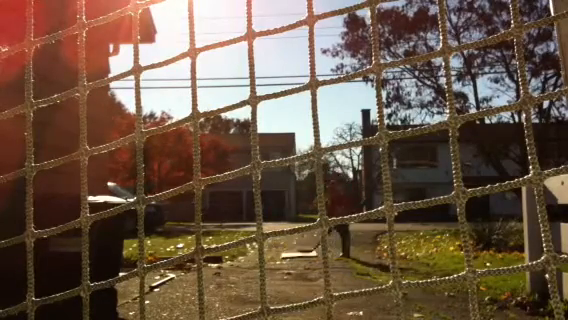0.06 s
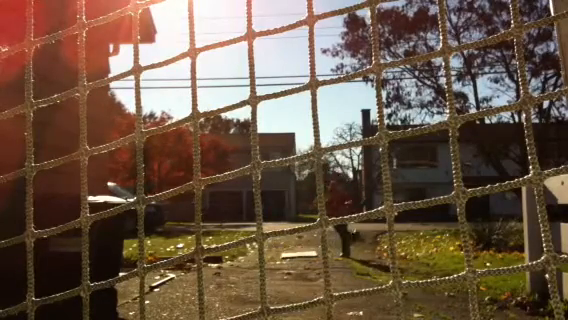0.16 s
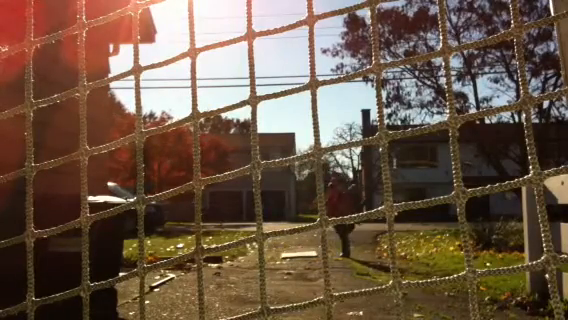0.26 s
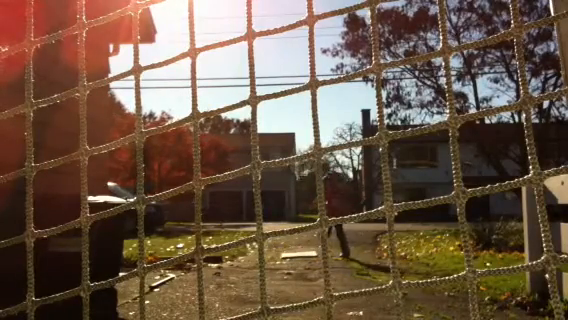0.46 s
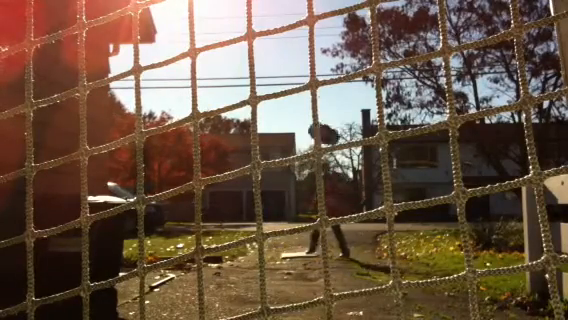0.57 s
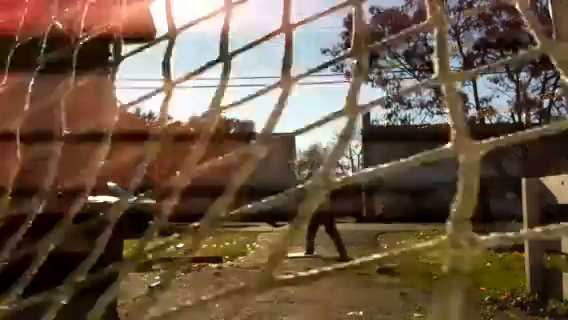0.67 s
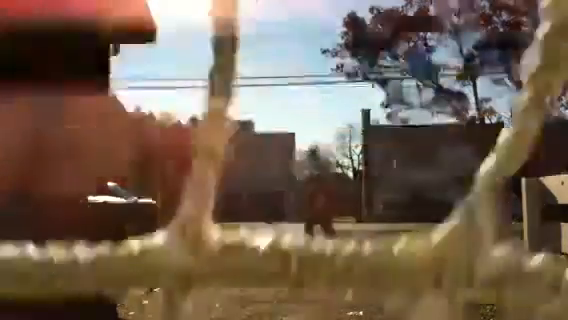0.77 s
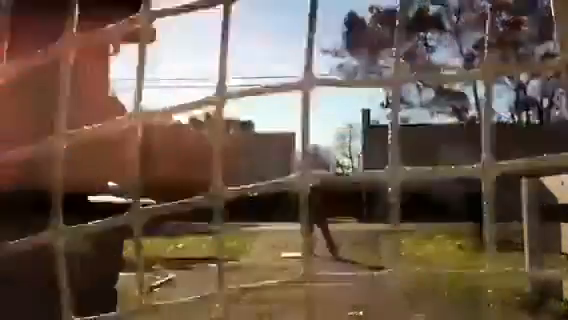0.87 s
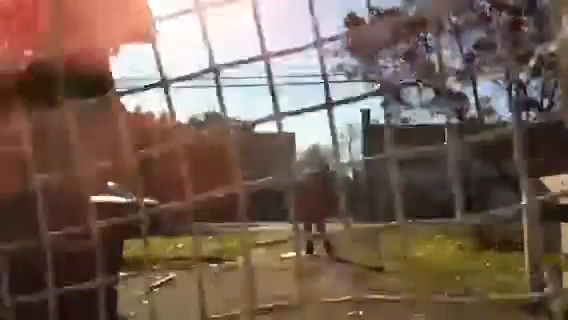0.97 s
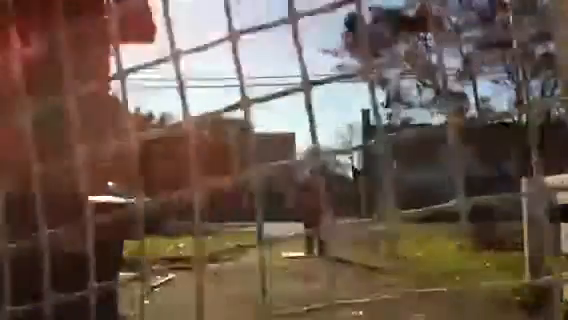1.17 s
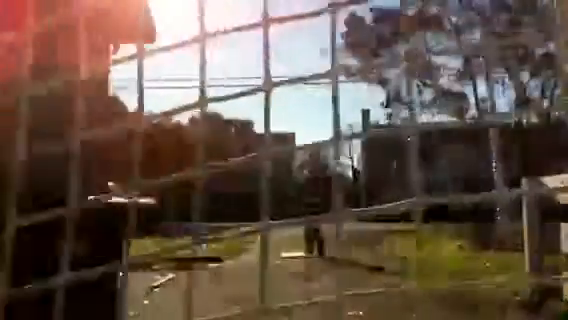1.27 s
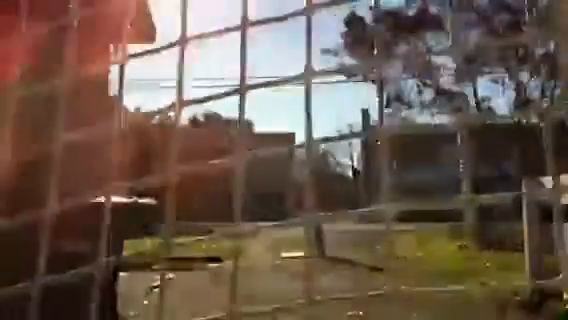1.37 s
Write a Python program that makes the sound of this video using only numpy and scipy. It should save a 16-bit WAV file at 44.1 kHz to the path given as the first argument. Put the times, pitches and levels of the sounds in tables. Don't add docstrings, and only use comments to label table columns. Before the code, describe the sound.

A hockey slapshot cracks across a quiet yard, then the puck slams into a rattling goal net

```python
import sys
import numpy as np
from scipy import signal
from scipy.fft import rfft, irfft, next_fast_len
from scipy.io import wavfile
from scipy.ndimage import uniform_filter1d, map_coordinates

SR = 44100
rng = np.random.default_rng(int(sys.argv[2]) if len(sys.argv) > 2 else 0)


def inscribe(sig):
    pcm = np.round(np.clip(np.atleast_2d(sig).T, -1, 1) * 32767)
    wavfile.write(sys.argv[1], SR, pcm.astype(np.int16))


def invert_db(x):
    u = np.asarray(x, float) / 20
    return 10 ** u


N = 61739


def unit(x):
    return x / np.sqrt(np.mean(x ** 2) + 1e-20)


def along(points, hz):
    f, v = np.transpose(points)
    return np.interp(np.log(hz + 1), np.log(f + 1), v)


def curves(rows):
    s, *cols = np.transpose(rows)
    return [np.interp(np.arange(N) / SR, s, c) for c in cols]


def gated(rows):
    before = [(rows[0][0] - .001, -150)]
    after = [(rows[-1][0] + .04, -150)]
    return invert_db(curves(before + list(rows) + after)[0])


def wobble(rate_hz):
    knots = rng.standard_normal(int(N * rate_hz / SR) + 4)
    return map_coordinates(knots, [np.arange(N) * rate_hz / SR])


def filtered(x, response):
    m = next_fast_len(N + SR // 2)
    return irfft(rfft(x, m) * response(np.fft.rfftfreq(m, 1 / SR)), m)[..., :N]


def resonant(x, peaks):
    def response(f):
        total = 0
        for k, (hz, width_hz, db) in enumerate(peaks):
            damping = 1j * f * width_hz
            total = total + (-1) ** k * invert_db(db) * damping / (hz * hz - f * f + damping)
        return total
    return filtered(x, response)


def rush(spectrum, patchy_db):
    z = signal.stft(rng.standard_normal(N + 512), nperseg=512)[2]
    field = uniform_filter1d(rng.standard_normal(z.shape), 5, 0)
    field = uniform_filter1d(field, 6, 1)
    x = signal.istft(z * invert_db(patchy_db * unit(field)), nperseg=512)[1][:N]
    return unit(filtered(x, lambda hz: invert_db(along(spectrum, hz))))


def tail(x, t60s):
    hz, t, z = signal.stft(rng.standard_normal(SR), SR, nperseg=256)
    decay = invert_db(-60 * t / along(t60s, hz)[:, None])
    h = signal.istft(z * decay, SR, nperseg=256)[1]
    return signal.fftconvolve(np.pad(x, (300, 0)), h / np.linalg.norm(h))[:N]


def snap(s, db, contact_s):
    u = (np.arange(N) / SR - s) / contact_s * 2
    return invert_db(db) * (1 - u * u) * np.exp(-u * u / 2)


# (time [s], traffic level [dB], hiss level [dB])
AIR = [(0, -50.5, 1), (.05, -50, 5), (.09, -52.5, 2), (.14, -55, 3.5), (.22, -54.5, 2), (.5, -57.5, -0.5),
       (.62, -58, -1.5), (.75, -55, 2.5), (1.4, -59.5, -8)]
# (frequency [Hz], density [dB per Hz])
TRAFFIC_COLOUR = [(18, -61), (30, -25), (113, -2), (321, -4), (437, -15), (530, -7), (1080, -8),
                  (1530, -19.5), (3000, -41), (3900, -24.5), (6600, -120)]
# (frequency [Hz], density [dB per Hz])
HISS_COLOUR = [(880, -9.5), (1500, -8), (1790, -7.5), (2070, -7), (15600, -22)]
SWELL_DB, HISS_DB = 1.5, -62.5


def street():
    traffic_db, hiss_db = curves(AIR)
    traffic = invert_db(traffic_db + SWELL_DB * wobble(13.25)) * rush(TRAFFIC_COLOUR, patchy_db=1.5)
    hiss = invert_db(HISS_DB + hiss_db) * rush(HISS_COLOUR, patchy_db=.8)
    return traffic + hiss


# (time [s], level [dB])
SHAKE = [(0.794, -43.5), (0.822, -29.5), (0.986, -38), (1.018, -33.5), (1.208, -43), (1.278, -51.5),
         (1.286, -49), (1.322, -48.5), (1.4, -48.5)]
# (time [s], gain over the rustle [dB])
FLICKS = [(.823, 3), (.833, 4), (.889, 4), (1.044, 3), (1.138, 4), (1.021, 5), (1.0245, 4), (1.118, 5),
          (1.166, 6), (1.2005, 8), (1.2455, 9), (1.2855, 9), (1.3795, 8), (1.395, 5)]
# (frequency [Hz], density [dB per Hz])
RUSTLE_COLOUR = [(880, -29), (1500, -4.5), (1860, -4.5), (2650, -10), (3800, -4), (7930, -6.5), (12500, -6),
                 (15600, -6)]
# (frequency [Hz], density [dB per Hz])
BODY_COLOUR = [(71, -57), (120, -18), (277, -2.5), (560, -3), (668, -6), (729, 0), (4000, -10), (5200, -15),
               (8800, -120)]
NET_START_S = SHAKE[0][0]
FLICK_S, RUSTLE_DB = .0042, 1.5
GRAINS_PER_S, GRAIN_DB = 5000, -2
BODY_DB, BODY_FADE_DB_S = -36.5, 30.5


def rustle():
    shake_db, = curves([(NET_START_S - .002, -120)] + list(SHAKE))
    flicks = np.array(FLICKS)
    late_s = np.arange(N) / SR - flicks[:, :1]
    whips = (late_s > 0) * np.exp(-np.abs(late_s) / FLICK_S)
    shake_db = shake_db + flicks[:, 1] @ whips

    ticks = (rng.random(N) < GRAINS_PER_S / SR) * rng.standard_normal(N)
    ticks = ticks * invert_db(GRAIN_DB * np.minimum(rng.exponential(size=N), 2))
    grains = unit(filtered(ticks, lambda hz: invert_db(along(RUSTLE_COLOUR, hz))))
    fibres = unit(.5 * grains + rush(RUSTLE_COLOUR, patchy_db=1.3))
    fizz = invert_db(shake_db + RUSTLE_DB + 1.1 * wobble(160)) * fibres

    t = np.arange(N) / SR - NET_START_S
    onset = np.clip((t - .004) / .0036, 0, 1)
    blow_db = 12.3 * np.exp(-np.abs(t) / .02)
    body_db = BODY_DB - BODY_FADE_DB_S * t + blow_db + .8 * wobble(68.8)
    return fizz + onset * invert_db(body_db) * rush(BODY_COLOUR, patchy_db=1.2)


# (time [s], peak [dB], pitch [Hz], length [cycles])
KNOCKS = [(0.2355, -23, 3800, 2.8), (.2395, -16, 764.5, 12), (0.2506, -22, 4420, 7),
          (.3620, -36, 1670, 3.4), (.3660, -49, 2200, 4), (0.2583, -22.5, 2040, 4.2),
          (.2625, -24.5, 2040, 9.7), (.2915, -34, 2100, 4), (0.7667, -36.5, 900, 0.73),
          (.7700, -41.5, 685, 1.8), (0.781, -35, 1090, 0.9), (0.7797, -41.5, 2200, 2),
          (0.7974, -20, 9100, 2.1), (0.811, -36, 900, 7), (0.816, -26, 1500, 1), (0.8230, -21.5, 1620, 2.3),
          (.8043, -27, 815, 4.1), (.8035, -27.5, 2020, 5), (.8160, -32, 790, 3.3), (.8255, -32.5, 796, 1.6),
          (.8350, -25.5, 2210, 4), (0.8378, -30, 1380, 3), (.8200, -38.5, 281, 2.7),
          (0.887, -38, 4960, 6.1), (.9060, -40.5, 660, 24.6), (0.926, -29.5, 1700, 3.1),
          (1.0195, -22.5, 1510, 1.2), (1.0211, -22.5, 1750, 2.2), (1.0215, -27, 397, 0.56),
          (1.0234, -18, 3490, 10), (1.0257, -18.5, 1320, 1.3), (1.030, -25.5, 510, 1.3),
          (1.02, -44.5, 170, 1.5), (1.0440, -26.5, 1810, 3.8), (1.0539, -21, 1100, 1.47),
          (1.0552, -24, 1860, 1.7), (1.057, -23, 1520, 2), (1.0568, -32, 324, 1.1),
          (1.1157, -22.5, 900, 0.58), (1.118, -33, 1300, 1.2), (1.12, -27, 1850, 1),
          (1.1553, -31, 900, 1.6), (1.2005, -46, 900, 1.3), (1.2450, -33, 268, 1.72),
          (1.2436, -37, 4440, 6.8), (1.361, -43, 390, 2.7), (1.3790, -36, 6560, 6.1)]
SPLASH_DB, SPLASH_S, SPLASH_REACH = -8, .014, 2.2


def knocks():
    out, t = np.zeros(N + SR), np.arange(SR // 20) / SR
    for s, db, hz, cycles in KNOCKS:
        u = t * hz / cycles * 3
        ring = -np.e * u * np.exp(-u) * np.sin(2 * np.pi * hz * t)
        low_cut = signal.butter(2, hz / 3, 'high', fs=SR, output='sos')
        ring = signal.sosfilt(low_cut, ring)
        top_hz = min(SPLASH_REACH * hz, SR * .4)
        band = signal.butter(3, [hz / 2, top_hz], 'band', fs=SR, output='sos')
        noise = unit(signal.sosfilt(band, rng.standard_normal(len(t))))
        noise = noise * np.minimum(t / .00011, 1)
        splash = invert_db(SPLASH_DB - 60 * t / (SPLASH_S + cycles / hz)) * noise
        out[round(s * SR):][:len(t)] += invert_db(db) * (ring + splash)
    return out[:N]


TAP_S, TAP_DB = 1.1381, -20.5


def tap():
    dip = -snap(TAP_S, TAP_DB, .00016)
    rebound = snap(TAP_S + .0006, TAP_DB + .5, .00045)
    return dip + rebound - snap(TAP_S + .0012, TAP_DB - 10, .0005)


# (frequency [Hz], width [Hz], level [dB])
TWINE = [(660, 330, -5), (900, 150, -6), (1470, 190, 1), (2090, 120, 8), (3100, 830, -12)]
SLIP_HZ, SLIP_PEAK_S, SLIP_DB = 660, .8053, -12.5
SLIP_RISE_S, SLIP_FALL_S = .005, .006
SLIP_CONTACT_S, PLUCK_CONTACT_S = .00055, .00022


def stretch():
    k = np.arange(-4, 16)
    s = SLIP_PEAK_S + (k + .05 * np.abs(k) * rng.standard_normal(len(k))) / SLIP_HZ
    slope = np.where(k < 0, -k / SLIP_RISE_S, k / SLIP_FALL_S)
    db = SLIP_DB - 11 * slope / SLIP_HZ - 4.5 * (k != 0)
    db = db + .6 * rng.standard_normal(len(k))
    slips = sum(snap(a, b, SLIP_CONTACT_S) for a, b in zip(s, db))
    plucks = sum(snap(a, b, PLUCK_CONTACT_S) for a, b in zip(s, db))
    return invert_db(-6.5) * slips + invert_db(-5.5) * plucks + invert_db(-.5) * resonant(plucks, TWINE)


# (time [s], pitch [Hz], level [dB])
HUM = [(.585, 398, -78), (.61, 392, -60), (.655, 383, -54), (.70, 352, -46), (.716, 330, -48),
       (.727, 305, -58), (.742, 282, -49), (.761, 284, -58), (.773, 316, -51), (.787, 312, -55),
       (.797, 305, -51)]
HUM_WANDER_HZ, HUM_FLUTTER_DB, HUM_END_S = 4, 2.5, .802


def puck():
    hz, db = curves(HUM)
    on, = curves([(HUM_END_S, 1), (HUM_END_S + .008, 0)])
    phase = 2 * np.pi * np.cumsum(hz + HUM_WANDER_HZ * wobble(58.0)) / SR
    tone = np.sin(phase) + invert_db(-19) * np.sin(2 * phase)
    return on * np.sqrt(2) * invert_db(db + HUM_FLUTTER_DB * wobble(50.3)) * tone


# (time [s], peak [dB], contact [s])
CHATTER = [
    (.2363, -20, .00025),
    (.2373, -17, .001),
    (.2402, -9, .0009),
    (.2425, -18, .0008),
    (.2443, -13, .0007),
    (.2493, -15, .0005),
    (.2517, -15, .0004),
]
# (frequency [Hz], width [Hz], level [dB])
BOARD = [(415, 40, 0), (775, 120, -6), (975, 100, -2), (1630, 300, -6), (2100, 300, -3), (3300, 600, -8),
         (4350, 600, -11), (617, 50, -4)]
# (time [s], level [dB])
SCRAPE = [(0.2315, -39), (.2358, -44), (0.2371, -29), (.2455, -26.5), (.247, -21), (.254, -26),
          (0.261, -25.5), (0.269, -37.5), (.281, -33.5), (.284, -47), (.30, -44)]
# (frequency [Hz], density [dB per Hz])
SCRAPE_COLOUR = [(300, -6), (800, -3.5), (1600, -4.5), (2300, -5.5), (3500, -7.5), (4600, -13),
                 (6000, -22.5), (9000, -38)]
# (time [s], level [dB])
GRIT = [(.2335, -49), (.245, -45), (.248, -38), (.259, -37.5), (.266, -42), (.275, -50), (.31, -60),
        (.35, -74)]
# (frequency [Hz], density [dB per Hz])
GRIT_COLOUR = [(3240, -25), (5500, -13), (7160, -1), (7810, -2), (15500, -8)]
# (frequency [Hz], t60 [s])
YARD = [(200, 0.17), (1000, 0.29), (3000, 0.19), (6000, 0.35), (14000, 0.16)]
# (frequency [Hz], t60 [s])
FAR = [(200, 0.51), (1500, 1.4), (4000, 0.85), (8000, 0.28)]
PUCK_HIT_S, PUCK_HIT_DB, PUCK_CONTACT_S = .2461, -3.8, .00023
RING_DB, DIRECT_DB, YARD_DB, FAR_DB = -1.5, -1.5, -12.5, -24
THIN_HZ = 110


def slapshot():
    blows = sum(snap(s, db, contact_s) for s, db, contact_s in CHATTER)
    crack = -snap(PUCK_HIT_S, PUCK_HIT_DB, PUCK_CONTACT_S)
    ring = invert_db(RING_DB) * resonant(blows + invert_db(-7) * crack, BOARD)
    scrape = gated(SCRAPE) * invert_db(1.5 * wobble(500)) * rush(SCRAPE_COLOUR, patchy_db=.8)
    grit = gated(GRIT) * invert_db(1.8 * wobble(354.4)) * rush(GRIT_COLOUR, patchy_db=5.0)
    direct = invert_db(DIRECT_DB) * blows + crack + scrape
    sent = direct + invert_db(-8) * ring
    echoes = invert_db(YARD_DB) * tail(sent, YARD) + invert_db(FAR_DB) * tail(sent, FAR)
    heard = direct + ring + grit + echoes
    return filtered(heard, lambda hz: (1j * hz / (THIN_HZ + 1j * hz)) ** 2)


def scene():
    hits = stretch() + knocks() + tap()
    net_hits = hits * (np.arange(N) > NET_START_S * SR)
    near_echo = invert_db(-10.5) * tail(net_hits, [(300, .28), (8000, .11)])
    mix = street() + rustle() + hits + near_echo + puck() + slapshot()
    return mix[None]


def low_pass(x):
    return signal.sosfilt(signal.butter(12, 16950, fs=SR, output="sos"), x)


# (from [s], to [s], corner [Hz])
MUTES = [
    (.2275, .2310, 150),
    (.2270, .2332, 1100),
    (.2665, .2725, 6200),
    (.7845, .7930, 2000),
    (.7860, .7945, 1100),
]
LOW_CUT_HZ, TOP_HZ = 80, 15850
OPEN_FROM_S, OPEN_TO_S = .793, .812


def record(dry):
    t = np.arange(N) / SR

    def during(from_s, to_s):
        return uniform_filter1d(((t > from_s) & (t < to_s)) * 1., size=40)

    x = filtered(dry, lambda hz: 1j * hz / (LOW_CUT_HZ + 1j * hz))
    for from_s, to_s, mute_hz in MUTES:
        dull = filtered(x, lambda hz: 1 / (1 + (hz / mute_hz) ** 10))
        x = x + during(from_s, to_s) * (dull - x)
    limited = filtered(x, lambda hz: np.clip((TOP_HZ - hz) / 250, 0, 1) ** 2)
    opened = invert_db(-27) * during(OPEN_FROM_S, OPEN_TO_S) * (x - limited)
    return low_pass(limited + opened)


dry = scene()
out = record(dry)
inscribe(out)
```